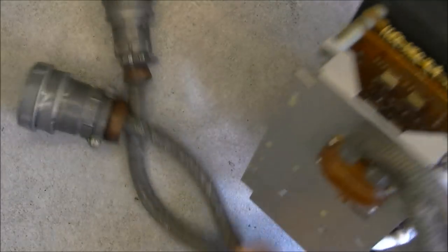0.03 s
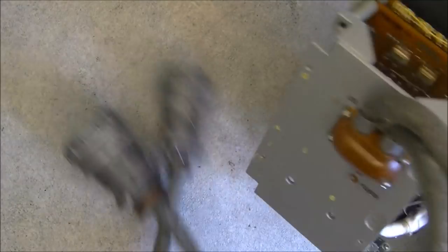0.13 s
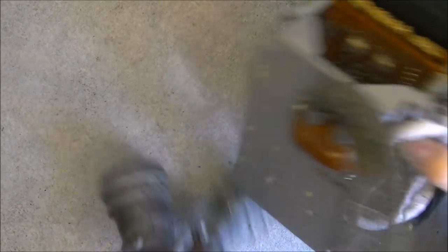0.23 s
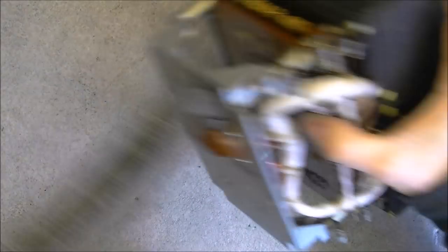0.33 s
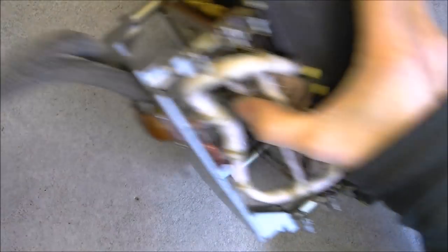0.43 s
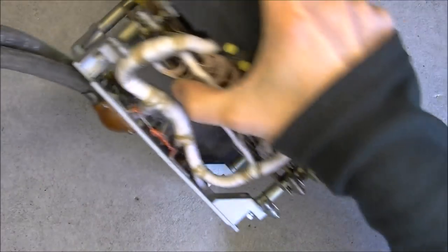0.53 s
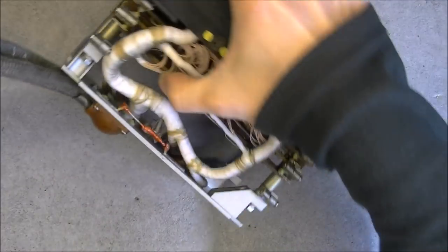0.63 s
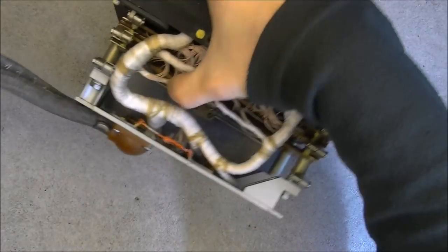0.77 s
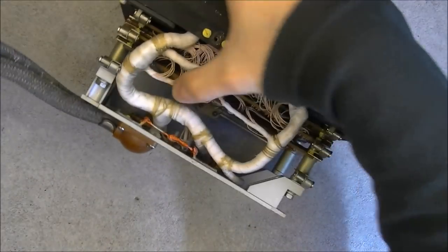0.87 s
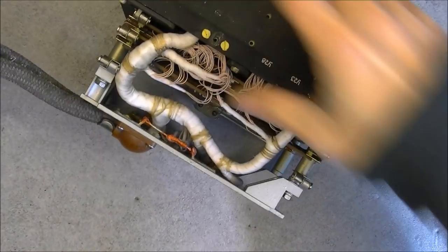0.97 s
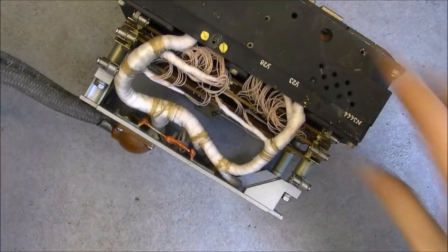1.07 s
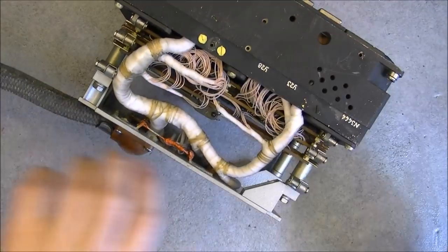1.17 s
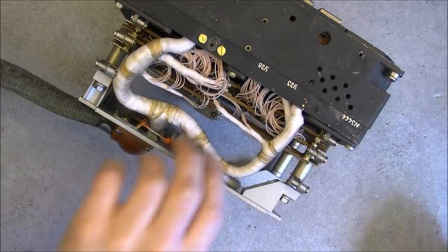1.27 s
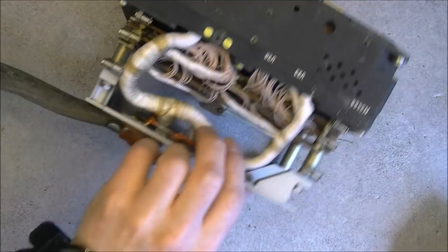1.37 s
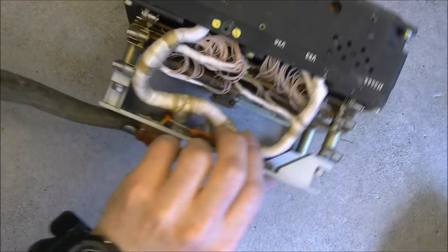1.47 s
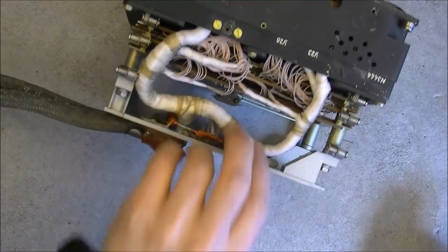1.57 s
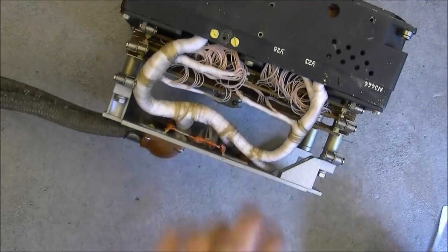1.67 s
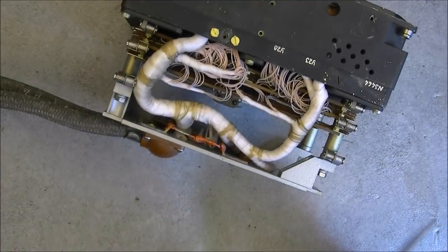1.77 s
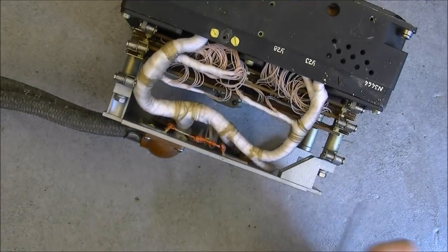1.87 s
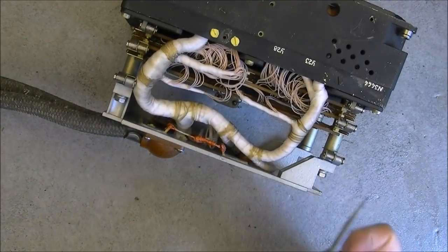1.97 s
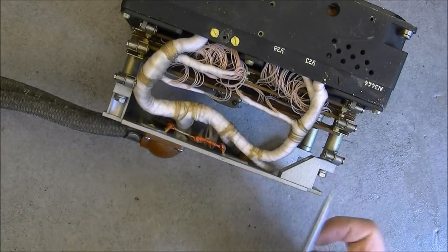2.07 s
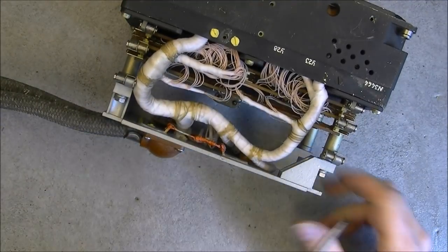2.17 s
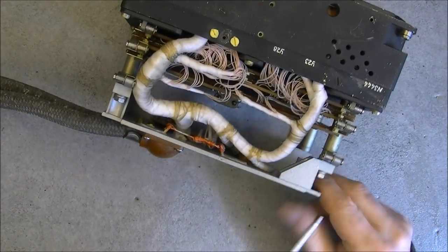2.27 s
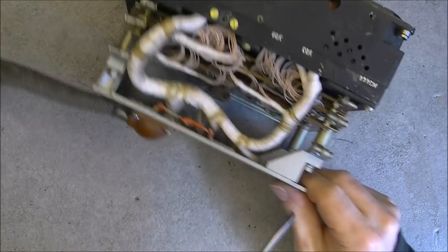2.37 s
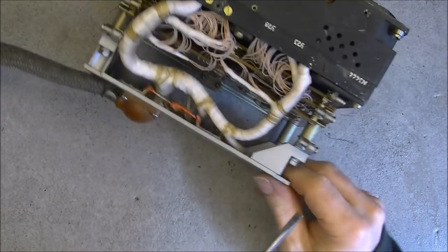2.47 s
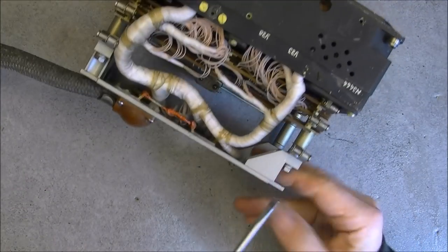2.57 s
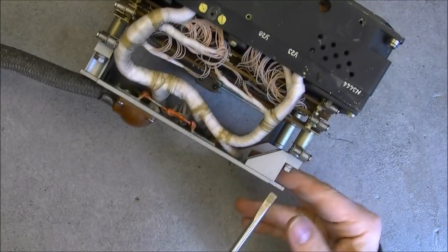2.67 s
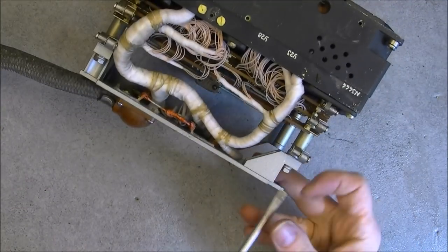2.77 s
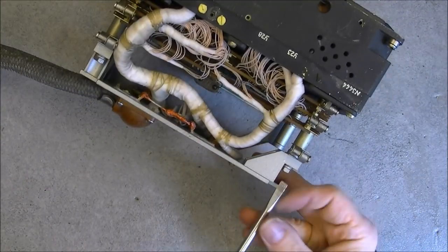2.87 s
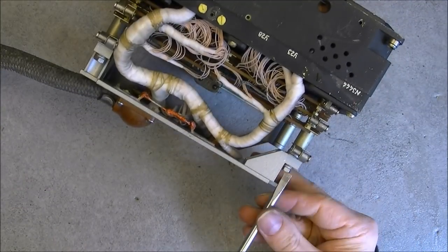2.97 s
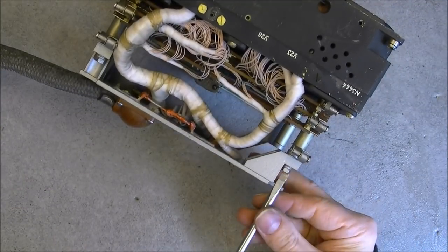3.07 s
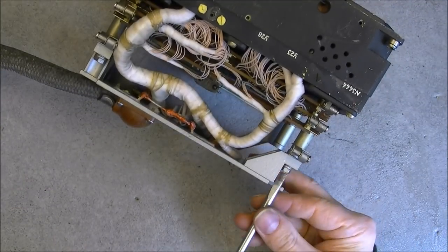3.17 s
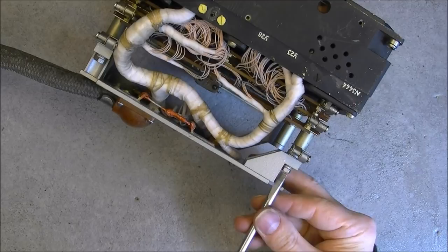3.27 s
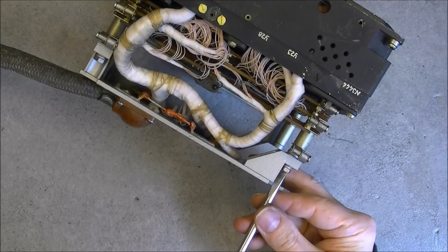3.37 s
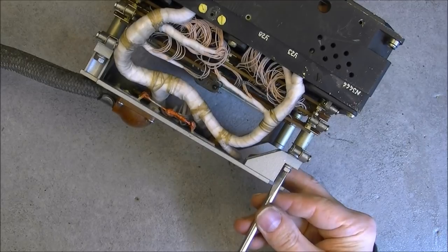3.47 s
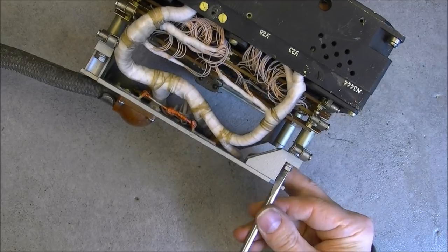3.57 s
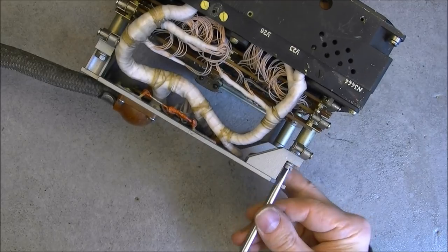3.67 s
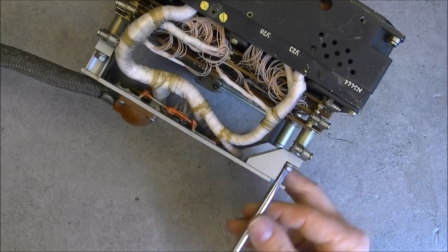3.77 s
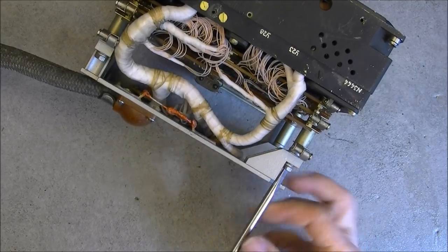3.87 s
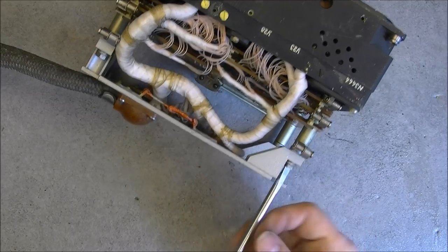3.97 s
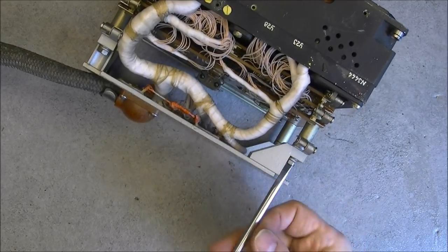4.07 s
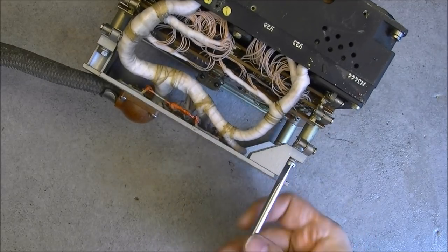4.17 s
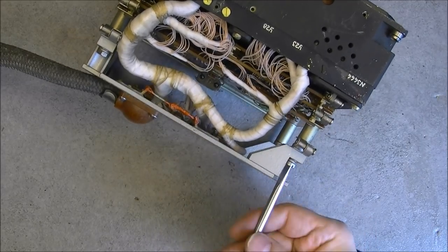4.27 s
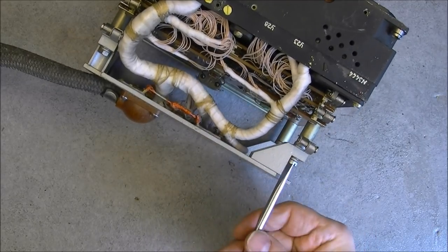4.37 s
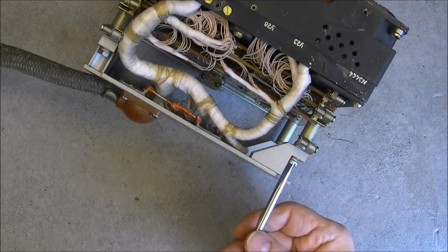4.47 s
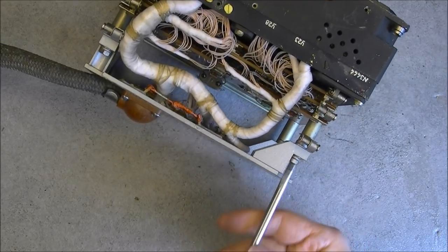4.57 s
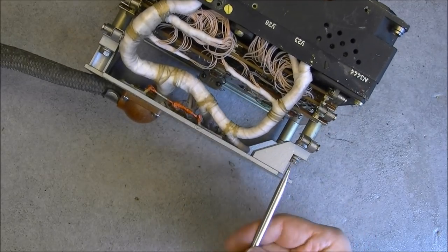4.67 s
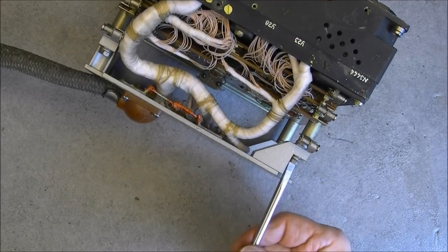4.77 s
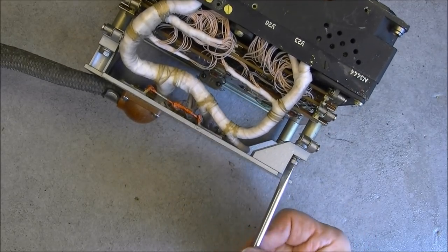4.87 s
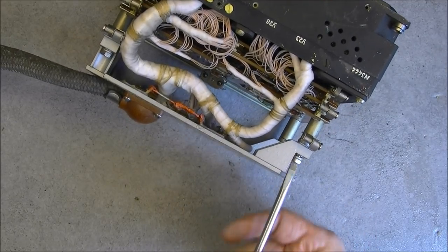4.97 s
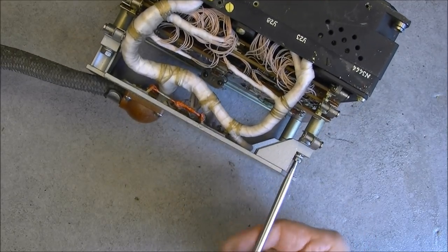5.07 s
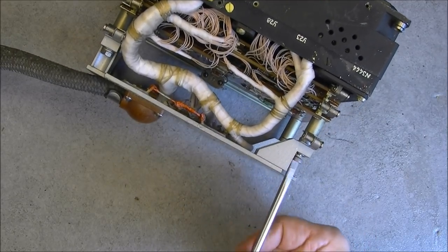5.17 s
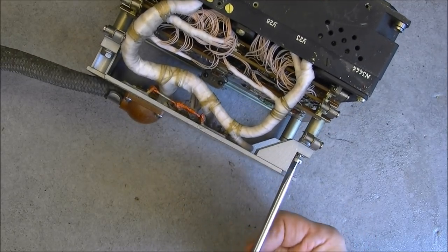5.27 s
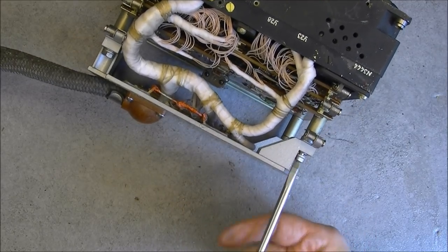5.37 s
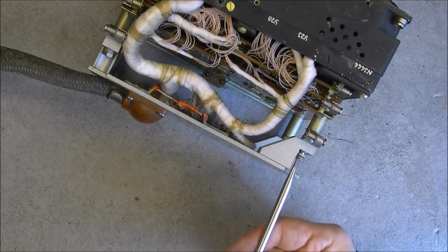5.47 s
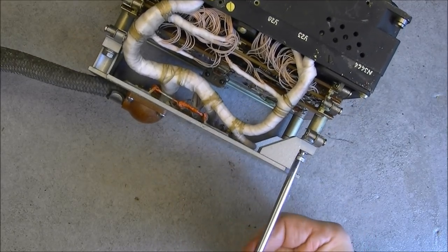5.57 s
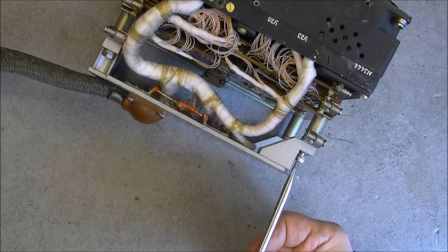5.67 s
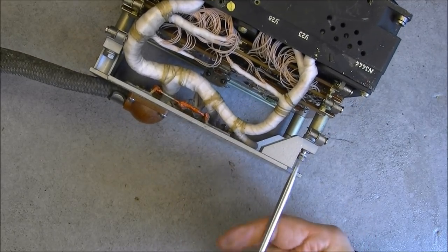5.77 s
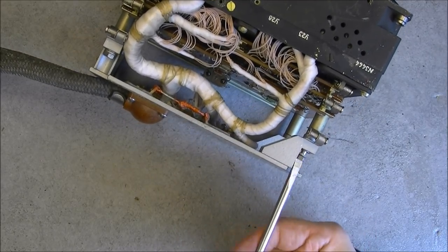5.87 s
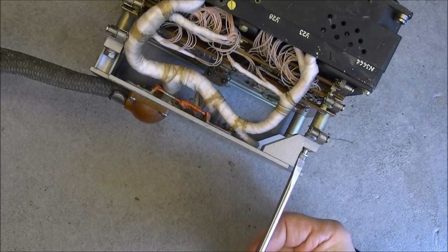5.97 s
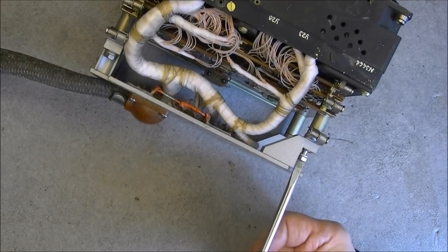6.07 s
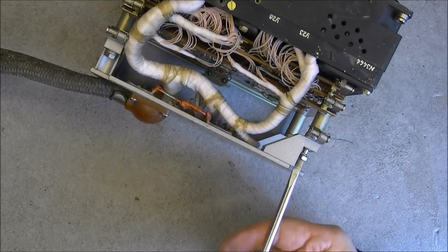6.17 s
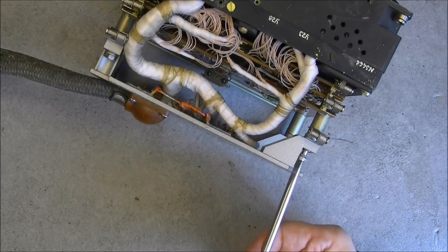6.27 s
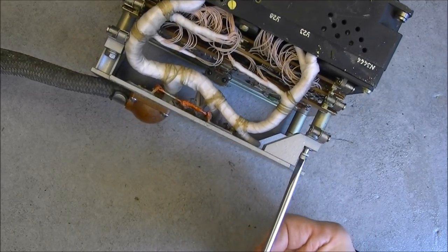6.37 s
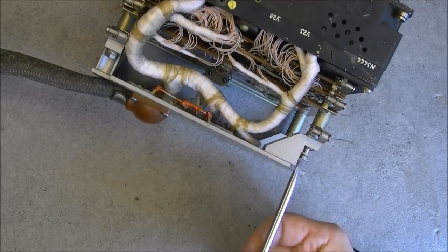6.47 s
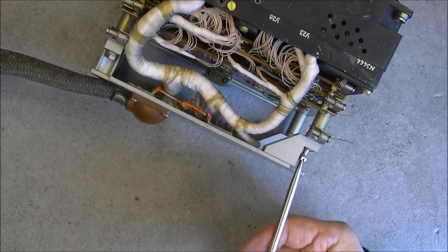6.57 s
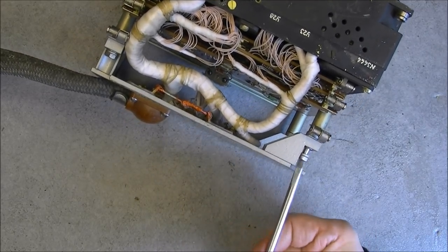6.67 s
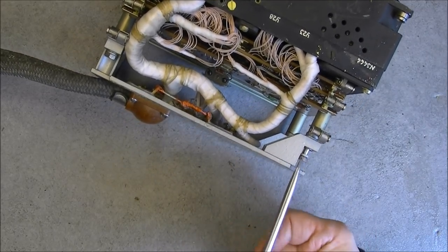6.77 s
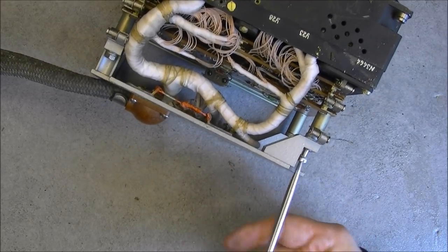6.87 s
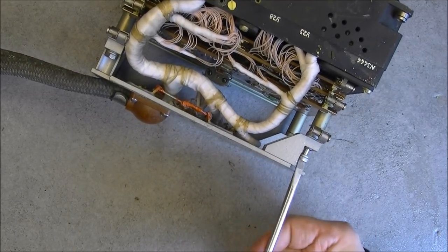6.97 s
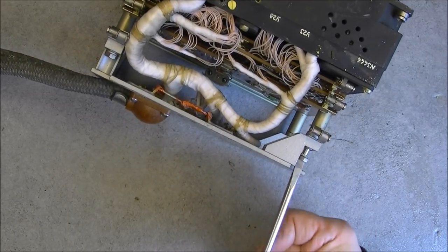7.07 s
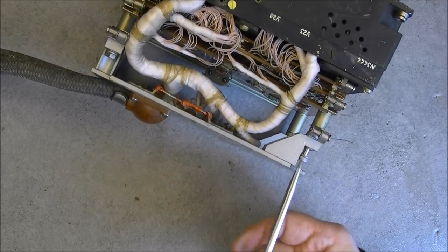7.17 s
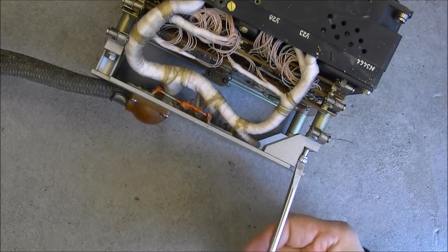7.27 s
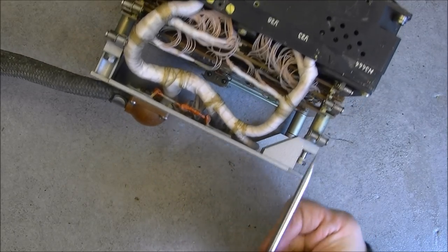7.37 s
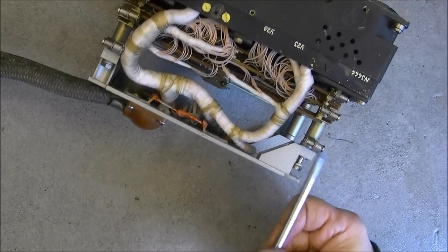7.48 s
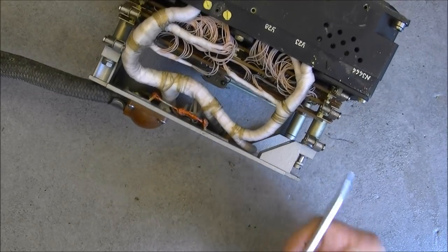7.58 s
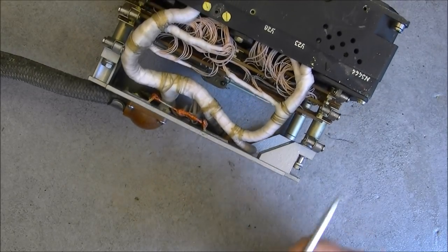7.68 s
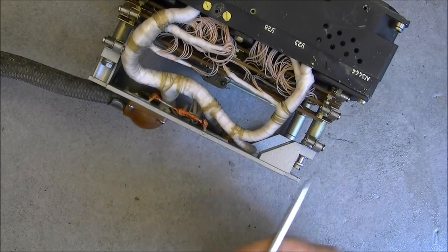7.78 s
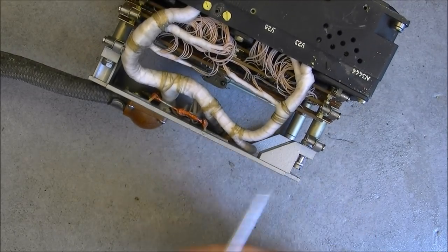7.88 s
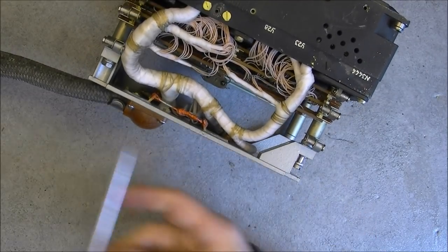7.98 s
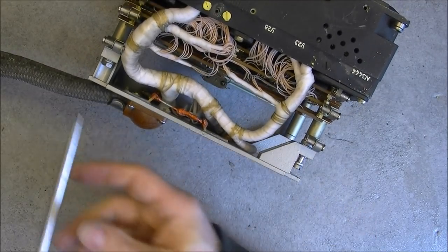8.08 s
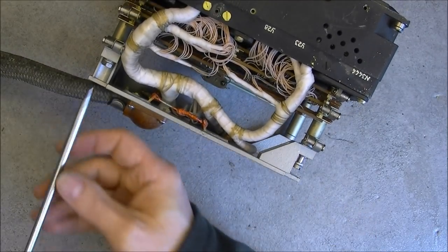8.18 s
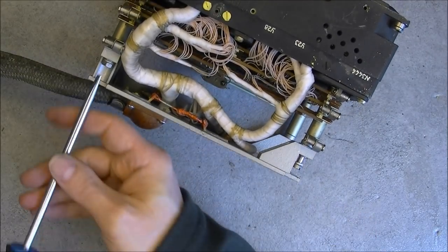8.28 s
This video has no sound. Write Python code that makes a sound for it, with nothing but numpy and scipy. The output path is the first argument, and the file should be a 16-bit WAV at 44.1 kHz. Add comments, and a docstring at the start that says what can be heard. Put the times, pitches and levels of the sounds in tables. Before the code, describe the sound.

Close up in a small room, a metal equipment chassis is swung round with loud scrapes and bright clinks, lands with a thump and is nudged into place. After quiet handling ticks, a screwdriver taps and skids onto a screw, turns it in quick regular rubbing strokes with a low rocking, then slips off with a sharp double clack and dull bump. A sleeve rustles past at the end.

```python
"""Metal chassis on a workbench

A metal equipment chassis is swung round and set down close by in a small room: it scrapes, its fittings clink,
it lands with a thump and is nudged into place. A screwdriver skids to a screw on the front panel, turns it in
short strokes and slips off with a double clack; a sleeve sweeps past. Blows ring damped modes and a noisy
clatter, rubbing is slip noise through resonances, and both excite a dense room tail over faint room air."""
import sys
import numpy as np
from scipy import signal
from scipy.fft import rfft, irfft
from scipy.io import wavfile
from scipy.ndimage import uniform_filter1d

SR = 44100
rng = np.random.default_rng(int(sys.argv[2]) if len(sys.argv) > 2 else 0)


def wav_out(sig):
    """Save sig, one row per channel (or a flat mono array), as 16-bit PCM at SR to the path in sys.argv[1]."""
    wavfile.write(sys.argv[1], SR, np.round(np.clip(np.atleast_2d(sig).T, -1, 1) * 32767).astype(np.int16))


N = 366912
TIME, HZ = np.arange(N) / SR, np.fft.rfftfreq(N, 1 / SR)

# Likeness of the two ears. Each row: frequency in Hz, left-right correlation from 0 to 1.
EAR_LIKENESS = [(60, .92), (140, .98), (280, .93), (500, .78), (1000, .5), (2000, .42), (4000, .25),
                (8000, .42), (13000, .2)]


def gain_of(db):
    """Decibel law: 20 dB is a tenfold amplitude."""
    return 10 ** (np.asarray(db) / 20)


def evened(x):
    """Normalisation of mean power: scales to rms 1."""
    return x / np.sqrt(np.mean(x ** 2) + 1e-20)


def read(points, hz):
    """Interpolation of a spectrum along a logarithmic frequency axis."""
    f, value = np.transpose(points)
    return np.interp(np.log(hz + 1), np.log(f + 1), value)


def level(rows, axis=1):
    """Amplitude envelope: interpolates one dB column over time, at -120 dB outside its span."""
    rows = np.array(rows)
    return gain_of(np.interp(TIME, rows[:, 0], rows[:, axis], left=-120, right=-120))


def add(mix, s, sound):
    """Superposition: mixes a sound into a stereo signal at time s."""
    part = mix[:, max(round(s * SR), 0):][:, :sound.shape[1]]
    part += sound[:, :part.shape[1]]


def noise(size=N, colour=((0, 0),)):
    """Partial interaural coherence: coloured stereo noise whose ears agree as far as EAR_LIKENESS says."""
    hz = np.fft.rfftfreq(size, 1 / SR)
    a, b = rfft(rng.standard_normal((2, size))) * gain_of(read(colour, hz))
    same = np.clip(read(EAR_LIKENESS, hz), -1, 1)
    return irfft([a, same * a + np.sqrt(1 - same ** 2) * b], size)


def coloured(x, gain):
    """Linear filtering: a gain for each frequency, then rms 1."""
    return evened(irfft(rfft(x) * gain, N))


def body(resonances):
    """Resonance response: sums the power of damped oscillators at each frequency."""
    power = 0
    for hz, width, db in resonances:
        detuning = (HZ ** 2 - hz ** 2) / (width * HZ + 1)
        power = power + gain_of(db) ** 2 / (1 + detuning ** 2)
    return np.sqrt(power)


def bands(x):
    """Band splitting: successive low- and high-pass filters give bass, middle, treble and top."""
    # Each entry: crossover frequency in Hz.
    crossovers_hz = (500, 2300, 6500)
    parts = []
    for hz in crossovers_hz:
        # each filter is run twice for a steeper slope
        low = np.tile(signal.butter(2, hz, "low", fs=SR, output="sos"), (2, 1))
        high = np.tile(signal.butter(2, hz, "high", fs=SR, output="sos"), (2, 1))
        parts.append(signal.sosfilt(low, x))
        x = signal.sosfilt(high, x)
    return parts + [x]


def band_gains(db, bright_db, lift_db, treble_share):
    """Contact stiffness: a hard contact tilts upward; a flexing panel lifts the middle and some treble."""
    step = np.arange(4) - 3 / 2
    return gain_of(db + bright_db * step + lift_db * np.array([0, 1, treble_share, 0]))


def dying(x, t60s):
    """Frequency-dependent damping: each frequency falls 60 dB in its own t60."""
    hz, t, z = signal.stft(x, SR, nperseg=256)
    decay = 10 ** (-3 * t / read(t60s, hz)[:, None])
    return signal.istft(z * decay, SR, nperseg=256)[1][:, :x.shape[1]]


def friction(slips_per_s, spread_db, smooth):
    """Stick-slip friction: many tiny slips of uneven size over a smooth hiss."""
    slipping = rng.random(N) < slips_per_s / SR
    sizes = gain_of(spread_db * np.minimum(rng.exponential(1, N), 4)) * slipping
    # the power of each slip decays with a time constant of 1.6 ms
    power = signal.lfilter([1], [1, -np.exp(-1 / (0.0016 * SR))], sizes ** 2)
    return noise() * np.sqrt(power / power.mean() + abs(smooth))


def swell(s, rise_s, fall_s, shape=2.3):
    """Kinematics of a hand movement: it gathers speed up to time s, then eases off."""
    return np.exp(-abs((TIME - s) / np.where(TIME < s, rise_s, fall_s)) ** shape)


def chatter(size, depth_db=6.0):
    """Repeated contact: metal on metal never meets just once but flutters within milliseconds."""
    flutter = evened(uniform_filter1d(rng.standard_normal(size), size=60))
    return gain_of(depth_db * np.clip(flutter, -2, 2))


def radiated(x, corner_hz=112):
    """Radiation efficiency: a small open chassis pushes hardly any deep bass into the air."""
    return signal.sosfilt(signal.butter(4, corner_hz, "high", fs=SR, output="sos"), x)


def blows(rows, modes, colour, clatter_db, clatter_s, buzz_db, buzz_s, size=16000):
    """Modal excitation: each blow rings the object's modes and a crowd of short dense ones."""
    out, t = np.zeros((2, N)), np.arange(size) / SR
    hz, mode_db, t60 = np.transpose(modes)[:, :, None]
    apart = np.arccos(np.clip(read(EAR_LIKENESS, hz), -1, 1))  # higher modes reach the ears out of step
    for s, contact, ring, db, bright_db, lift_db in rows:
        phase, side, uneven, grip = rng.standard_normal((4, len(hz), 1))
        tones = gain_of(mode_db + 1.5 * uneven) * 10 ** (-3 * t / (t60 * ring))
        # the grip detunes each blow a little
        turn = 2 * np.pi * hz * (1 + 0.0027 * grip) * t + phase * apart * 2
        half_gap = np.sign(side) * apart / 2
        rung = np.array([(tones * np.sin(turn + ear * half_gap)).sum(0) for ear in (-1, 1)])
        # a crack from the contact, then the buzz of loose parts
        crack = np.exp(-t / (clatter_s * ring + contact))
        buzz = gain_of(buzz_db) * np.exp(-t / (buzz_s * ring))
        clatter = chatter(size) * noise(size, colour) * (crack + buzz)
        onset = 1 - np.exp(-(t / contact) ** 2)
        sound = (evened(rung) + gain_of(clatter_db) * evened(clatter)) * onset
        # where the blow lands sets its colour; each band is levelled over its first 20 ms
        first = round(.02 * SR)
        gains = band_gains(db, bright_db, lift_db, treble_share=0.31)
        parts = bands(radiated(sound))
        add(out, s, sum(gain * part / part[:, :first].std() for gain, part in zip(gains, parts)))
    return out


def background(ramp_s=.04):
    """Stationary noise and free decay: room air, thin whines and a low ring that dies slowly."""
    # Spectrum of the room air. Each row: frequency in Hz, relative level in dB.
    air_colour = [(15, -43), (25, -3), (180, -2.5), (217, -6.5), (335, -7), (575, -9), (936, -7),
                  (1070, -9.5), (2480, -13), (2760, -11.5), (5280, -19.5), (12200, -23.5), (16000, -24)]
    # Faint electrical whines. Each row: frequency in Hz, rms level in dB.
    whine_tones = [(2726, -74.5), (14350, -81)]
    air_db = -56
    whines = sum(gain_of(db) * evened(np.sin(2 * np.pi * hz * TIME)) for hz, db in whine_tones)
    # the low ring dies slowly until the hand stops it
    from_s, to_s, linger_hz = 0.57, 3.1, 166.9
    start_db, fall_db_per_s = -46.5, 10.5
    free = np.clip(np.minimum(TIME - from_s, to_s - TIME) / ramp_s, 0, 1)
    decay = gain_of(start_db - fall_db_per_s * (TIME - from_s))
    linger = free * decay * evened(np.sin(2 * np.pi * linger_hz * TIME))
    return gain_of(air_db) * coloured(noise(), gain_of(read(air_colour, HZ))) + whines + linger


def sliding():
    """Friction-driven resonance: slip noise rings the chassis, with a few light brushes and swishes."""
    # Resonances of the sliding chassis. Each row: frequency in Hz, width in Hz, relative level in dB.
    slide_body = [(72, 8.9, -17), (171, 48, 5.5), (216, 36, 6), (275.7, 9.6, 11.5), (398.8, 9.8, 11.5),
                  (465.5, 20, 5), (562, 84, -2), (704, 360, -4), (898, 42, -0.5), (1060, 74, -4.5),
                  (1275, 130, -10.5), (1630, 390, -5), (1810, 86, -19), (2145, 120, -14), (2970, 35, -10.5),
                  (3410, 340, -16), (4430, 91, -18), (4770, 62, -12.5), (5600, 910, -21), (7900, 1040, -24),
                  (9900, 1600, -26), (12100, 990, -27.5)]
    # Shoves of the chassis, with a few light brushes and swishes of the screwdriver. Each row: time of the
    # peak in seconds, swell in seconds, fade in seconds, relative level in dB, brightness in dB per band,
    # midrange lift in dB.
    strokes = [(0.0, .02, 0.079, -25, -3.5, -2), (0.1, 0.026, 0.054, -24, -8, -10),
               (0.175, 0.08, 0.048, -18.5, -4.5, 0), (0.304, 0.045, 0.028, -30.5, 1, 9),
               (0.48, 0.037, .08, -45.5, -4, -0.5), (0.69, 0.054, 0.069, -25.5, 2.5, -3.5),
               (0.815, 0.027, .1, -42.5, -10.5, 4.5), (1.03, 0.13, 0.11, -46.5, 2.5, 4),
               (1.165, 0.037, 0.12, -39, 0.8, 7), (1.28, 0.033, 0.065, -36, 3, 2),
               (1.415, 0.029, 0.017, -44.5, -5.5, 9), (1.504, 0.062, 0.053, -31.5, -4, 0.5),
               (1.755, 0.023, 0.027, -55, -15.5, 11.5), (1.85, 0.032, 0.044, -67.5, -6, 23),
               (2.345, 0.03, 0.048, -38, -5, 1.5), (2.465, 0.058, 0.048, -28.5, -3.5, 2.5),
               (2.66, 0.056, 0.061, -48.5, 0, -2), (2.785, 0.043, 0.034, -47, 0.5, -1),
               (3.56, 0.11, .12, -59.5, -6, 1), (3.89, 0.065, 0.097, -48.5, 5, 2),
               (4.09, 0.057, .05, -52, -5.5, 0), (4.45, 0.032, 0.043, -49.5, -7, 7.5),
               (7.66, 0.17, 0.21, -55, 1.5, 5.5), (7.715, 0.021, 0.042, -48.5, 7.5, -2)]
    grating = coloured(friction(slips_per_s=900, spread_db=3.0, smooth=1.0), body(slide_body))
    power = 0
    for s, rise, fall, *contact in strokes:
        gains = band_gains(*contact, treble_share=0.86)
        power = power + np.outer(gains, swell(s, rise, fall)) ** 2
    return sum(np.sqrt(p) * evened(part) for p, part in zip(power, bands(grating)))


def knocks():
    """Impact of a heavy body: the whole chassis against the bench excites the low modes."""
    # Knocks on the bench. Each row: start in seconds, contact time in seconds, ring length as a factor,
    # relative level in dB, brightness in dB per band, midrange lift in dB.
    strikes = [(0.052, 0.0027, 0.49, -28, -3.5, -9), (0.612, 0.0014, .3, -43.5, -15.5, 1),
               (0.7655, 0.00039, 0.37, -25.5, -12, 3.5), (1.309, 0.0022, 0.45, -43.5, -10, -4),
               (1.697, 0.0017, 0.66, -41, -5, -4), (3.994, 0.0004, 0.87, -48, -7, 6.5),
               (4.227, .0015, 0.61, -42.5, -8.5, 9), (4.607, 0.0016, 1, -50, -7, 8),
               (7.492, 0.0015, 0.5, -41.5, -12, -12), (7.618, 0.0048, 0.46, -48, -7, -13),
               (7.87, 0.0022, 0.39, -50, -10, -11)]
    # Modes of the bench. Each row: frequency in Hz, relative level in dB, t60 in seconds at ring factor 1.
    modes = [(153.3, -6, 0.57), (186, 4, 0.16), (222.5, -4.5, 0.15), (259, 0, 0.23), (301, 6, 0.067),
             (402, -6.5, 0.17), (377, -31, 0.059), (539, -11, 0.15), (743, -18, 0.21), (904, -20, 0.32),
             (1320, -21, 0.44)]
    # Its dense, short-lived modes. Each row: frequency in Hz, relative level in dB.
    dense = [(25, -29), (60, -21), (95, -15), (150, 6), (300, -7), (500, -8.5), (850, -9), (2300, -19.5),
             (6500, -26), (15000, -28)]
    return blows(strikes, modes, dense, clatter_db=-5.0, clatter_s=0.017, buzz_db=-15, buzz_s=0.034)


def clinks():
    """Impact of small stiff bodies: steel fittings, edges and a screwdriver tick at high frequencies."""
    # Clinks of the fittings and light ticks of the screwdriver being picked up. Each row: start in seconds,
    # contact time in seconds, ring length as a factor, relative level in dB, brightness in dB per band,
    # midrange lift in dB.
    strikes = [(0.0755, 0.00018, 0.15, -35.5, 1, 9), (0.172, 0.00034, 0.45, -22.5, 3.5, -7),
               (0.186, 0.00026, 0.12, -33, 5, 10), (0.2335, 0.0004, 0.093, -30.5, 10, 5),
               (0.3205, 0.00033, 0.31, -24, 6.5, 0.5), (0.6105, 0.0029, 0.21, -34.5, 12.5, 16),
               (0.642, 0.0019, 0.1, -33, 11.5, 9), (0.683, 0.0021, 0.42, -30, 5.8, 4),
               (0.9843, .0005, .35, -57, 4, 13), (1.0606, 0.00044, .45, -54, 4.5, 13),
               (1.1145, 0.00056, 0.3, -56.5, 5, 12), (1.2098, 0.0015, 0.26, -29, 4, 14.5),
               (1.2675, 0.00022, 0.33, -32.5, 4, 5), (1.3953, .0009, .35, -49.5, -4.5, -4),
               (2.1188, 0.00044, 0.24, -65.5, 3, 16.5), (2.18, 0.005, 1, -70.5, 3, 27.5),
               (2.4075, .0001, 0.045, -40, 2.5, -8), (2.6556, 0.00041, 0.88, -48, -3.5, 1),
               (3.3096, .0005, .35, -61.5, 5.3, -2), (3.681, .0003, 0.44, -60.5, 5.5, 8.5),
               (4.0215, .0004, 0.28, -41.5, -3.5, -28), (4.1305, 0.00064, 0.068, -47.5, 14.5, 14.5)]
    # Modes of the fittings. Each row: frequency in Hz, relative level in dB, t60 in seconds at ring factor 1.
    modes = [(3070, -11.5, 0.028), (4200, -21, 0.049), (5030, 10.5, 0.062), (4940, 3, 0.52),
             (5760, 1, 0.17), (7880, 12.5, 0.15), (7450, -44.5, 0.4), (8460, 21.5, 0.031),
             (7750, -36, 0.04), (8960, 9, .05), (13100, -4, 0.16)]
    # Their dense, short-lived modes. Each row: frequency in Hz, relative level in dB.
    dense = [(100, -8.5), (1000, -14.5), (2300, -0.5), (4200, 3.5), (5300, 12), (6900, 3), (8100, 4.5),
             (10800, 3), (12900, 6.5), (14500, -9)]
    return blows(strikes, modes, dense, clatter_db=4, clatter_s=.004, buzz_db=-13.5, buzz_s=0.053)


def bumps(contact_s=0.003, size=20000):
    """Low-frequency modal sway: a soft push moves the bench top, the same in both ears."""
    # Pushes on the bench top. Each row: start in seconds, relative level in dB.
    pushes = [(0.768, -36.5), (1.31, -46), (1.693, -31.5), (2.63, -53), (7.491, -28.5), (7.615, -48)]
    # Sway of the bench top. Each row: frequency in Hz, relative level in dB, t60 in seconds.
    sway_modes = [(34, -18, .3), (52, -2, 0.15), (71, 0, 0.26), (108, -7, 0.075)]
    out, t = np.zeros((2, N)), np.arange(size) / SR
    sway = 0
    for hz, db, t60 in sway_modes:
        sway = sway + gain_of(db) * 10 ** (-3 * t / t60) * np.sin(2 * np.pi * hz * t)
    onset = 1 - np.exp(-t / contact_s)
    for s, db in pushes:
        add(out, s, gain_of(db) * (sway * onset)[None])
    return out


def taps():
    """Impact on a thin plate: fingers and screwdriver excite the modes of the panel."""
    # Taps on the panel. Each row: start in seconds, contact time in seconds, ring length as a factor,
    # relative level in dB, brightness in dB per band, midrange lift in dB.
    strikes = [(1.6445, 0.0019, 0.66, -62.5, 0.5, 17.7), (1.7457, 0.0017, 0.46, -65, -6, 5.4),
               (1.955, .0023, .6, -75.5, 1.5, 23.6), (3.016, 0.00041, 0.56, -39, 0, 17.1),
               (3.066, .002, .5, -59.5, -11, 18.5), (3.1116, 0.00062, .55, -61.5, -6.5, 12.4),
               (3.3795, 0.00036, 0.96, -56.5, -5, 24.9), (3.438, 0.0011, 0.55, -43, -3, 3.5),
               (3.595, 0.0013, .35, -61.5, -7.5, 14.7), (3.826, 0.00095, 0.65, -63, -7, 6.5),
               (3.9235, 0.00045, 1, -53, -3.5, 4.2), (4.153, .0009, 0.61, -60, 4.7, 17.5),
               (4.167, 0.00088, .35, -65.5, 1, 15), (5.4233, .001, 0.69, -52.5, -1, 7.4),
               (7.371, 0.00065, 0.48, -33.5, 2, 14), (7.377, 0.0035, 0.39, -25, 2, 5.5),
               (7.394, 0.0039, 1, -50.5, -7, 23.7), (7.4362, .0006, 0.37, -28.5, -1.5, 13.7),
               (7.462, .0005, 0.89, -45.5, 2, 24.6), (7.523, 0.0013, .7, -47.5, -7.5, 4.4)]
    # Modes of the panel. Each row: frequency in Hz, relative level in dB, t60 in seconds at ring factor 1.
    modes = [(228.6, -4, 0.27), (585, -13, 0.39), (707.4, -7.5, 0.34), (834, -13, 0.41), (922, -5, 0.14),
             (1110, -13, 0.14), (1235, 3, 0.098), (1296, 5.5, 0.11), (1360, -10, 0.42), (1667, 14, 0.04),
             (1734, 9.5, 0.11), (1783, -12, 0.39), (1855, 0, 0.04), (2014, 4.5, 0.081), (2600, -25, 0.16),
             (3323, 0.5, 0.083), (3810, 4.5, 0.043), (4030, -26, 0.045), (4360, 1.5, 0.086),
             (7160, -16, 0.086)]
    # Its dense, short-lived modes. Each row: frequency in Hz, relative level in dB.
    dense = [(60, -26), (130, -17), (230, -6), (450, 3.5), (1300, 5), (2400, 2), (3500, 6.5), (8000, -10.5),
             (12000, -19), (15000, -42)]
    return blows(strikes, modes, dense, clatter_db=-1.0, clatter_s=0.00067, buzz_db=-12, buzz_s=0.015)


def skidding():
    """Friction-driven resonance: the blade slides on the screw head and makes the panel sing."""
    # The blade seeks the slot, starts to turn and slips off. Each row: time of the peak in seconds,
    # swell in seconds, fade in seconds, level in dB.
    skids = [(3.755, 0.028, 0.04, -49), (3.9, 0.068, 0.049, -63), (4.12, 0.1, 0.063, -47),
             (4.37, 0.064, 0.067, -58), (4.85, 0.42, 0.39, -44.5), (7.372, 0.018, .008, -29.5)]
    # Resonances of the panel under the skids. Each row: frequency in Hz, width in Hz, relative level in dB.
    skid_body = [(1356, 130, -0.5), (1390, 76, 3), (1653, 99, 5.5), (2260, 440, -8.5), (4670, 1600, -18),
                 (7300, 930, -15), (8850, 4800, -24.5)]
    speed = sum(gain_of(db) * swell(s, rise, fall, shape=2.35) for s, rise, fall, db in skids)
    rub = friction(slips_per_s=200, spread_db=2.5, smooth=1.0)
    return speed * coloured(rub, body(skid_body) * HZ / (HZ + 900))


def screwing():
    """Thread friction: each turn hisses and sings in the panel; the chassis rocks under the hand."""
    # Turns of the screw. Each row: time of the peak in seconds, half length in seconds, relative level of
    # the rub in dB, relative level of the rocking in dB, lag of the rocking in seconds.
    turns = [(4.626, 0.05, -41.5, -37, -0.022), (4.958, 0.25, -40.5, -37, 0.046),
             (5.25, 0.036, -38.5, -35.5, 0.013), (5.438, 0.09, -40, -38, 0.045),
             (5.631, 0.058, -39.5, -35.5, 0.028), (5.814, 0.069, -38, -42.5, -0.039),
             (6.004, 0.067, -38.5, -32, 0.025), (6.19, 0.056, -38, -45, 0.018),
             (6.373, 0.07, -39, -31.5, 0.015), (6.554, 0.068, -39.5, -40, -0.036),
             (6.717, 0.046, -36, -33.5, 0.0014), (6.893, 0.064, -38, -34, -0.02),
             (7.065, 0.045, -32.5, -31, 0.024), (7.238, 0.078, -39.5, -36.5, -0.011)]
    # Panel resonances under the screwdriver. Each row: frequency in Hz, width in Hz, relative level in dB.
    turn_body = [(727, 116, 1), (847, 66, -0.5), (1276, 61, 5), (1420, 49, -6), (1668, 107, 5.5),
                 (2400, 300, -35), (3367, 53, -3), (4540, 980, -11)]
    # Hiss of the thread. Each row: frequency in Hz, relative level in dB.
    thread_hiss = [(100, -42), (350, -8), (1000, -18.5), (2600, -14), (5000, -17), (9500, -13.5),
                   (12000, -16.5), (16000, -30)]
    # Resonances of the rocking chassis. Each row: frequency in Hz, width in Hz, relative level in dB.
    rock_body = [(76.5, 10.6, -7.5), (136, 30, -12), (199.2, 15.4, 2), (267, 45, -8), (404, 23, -15.5)]
    stroke, tipping = 0, 0
    for s, half, rub_db, rock_db, lag in turns:
        stroke = stroke + gain_of(rub_db) * np.exp(-((TIME - s) / half) ** 2)
        # the chassis tips quickly and settles slowly
        tipping = tipping + gain_of(rock_db) * swell(s + lag, rise_s=0.034, fall_s=0.066, shape=1.3)
    # smooth: even hiss of the thread, as a multiple of the power of its slips
    rub = friction(slips_per_s=3800, spread_db=6, smooth=1.1)
    thread = coloured(rub, body(turn_body) + gain_of(read(thread_hiss, HZ)))
    rocking = coloured(noise(), body(rock_body) / (1 + (HZ / 700) ** 2))
    return gain_of(-2.0) * stroke * thread + gain_of(-3.5) * tipping * rocking


def sleeve(width_hz=170):
    """Cavity resonance: cloth hisses past with a hollow rustle whose pitch follows the gap under the arm."""
    # Course of the sleeve. Each row: time in seconds, relative level of the rustle in dB,
    # resonance in Hz, relative level of the hiss in dB.
    sweep = [(7.78, -50, 298, -57), (7.82, -48.5, 440, -60.5), (7.852, -57, 239, -51),
             (7.868, -47, 239, -55.5), (7.99, -43.5, 563, -52), (8.234, -40.5, 231, -50.5),
             (8.32, -44.5, 274, -55.5)]
    # Spectrum of the hiss. Each row: frequency in Hz, relative level in dB.
    hiss_colour = [(300, -21), (900, 4), (1800, 3), (3000, 0.5), (9000, -5), (12000, -4.5), (16000, -8)]
    s, _, hz, _ = np.transpose(sweep)
    # shifted down to 0 Hz, smoothed, and shifted back: a resonance that moves
    turn = np.exp(2j * np.pi * np.cumsum(np.interp(TIME, s, hz)) / SR)
    r = np.exp(-np.pi * width_hz / SR)
    rustle = coloured(noise(), 1 / (1 + (HZ / 1100) ** 2))
    hollow = (turn * signal.lfilter([1 - r], [1, -r], rustle / turn)).real
    hiss = coloured(friction(slips_per_s=3000, spread_db=-9, smooth=1.4), gain_of(read(hiss_colour, HZ)))
    return gain_of(-0.5) * level(sweep) * evened(hollow) + gain_of(3.5) * level(sweep, axis=3) * hiss


def room(x, onset_s=0.0089, size=26000):
    """Reverberation: dense reflections swell in a few milliseconds and die at a speed set by frequency."""
    # Decay of the room. Each row: frequency in Hz, t60 in seconds.
    room_t60 = [(100, 0.28), (260, 0.46), (700, 0.42), (1840, 0.28), (4850, 0.29), (12800, 0.2)]
    onset = 1 - np.exp(-(np.arange(size) / SR / onset_s) ** 2)
    tail = dying(noise(size), room_t60) * onset
    return signal.fftconvolve(x, tail / np.linalg.norm(tail[0]), axes=1)[:, :N]


def scene():
    """Superposition of direct and reverberant sound: blows, rubbing and the room around them."""
    hits = gain_of(-4.0) * clinks() + gain_of(-0.45) * taps() + gain_of(-4.5) * knocks()
    rubs = gain_of(-11.5) * sliding() + screwing() + skidding() + sleeve()
    echoes = gain_of(-12.0) * room(hits) + gain_of(-10.0) * room(rubs)
    return hits + rubs + echoes + bumps() + background()


def record(dry, low_cut_hz=48, top_hz=14200):
    """Band limiting and soft saturation: microphones lose both extremes, and the loudest peaks are rounded."""
    heard = signal.sosfilt(signal.butter(2, low_cut_hz, "high", fs=SR, output="sos"), dry)
    heard = signal.sosfilt(signal.butter(4, top_hz, fs=SR, output="sos"), heard)
    rounded = heard / (1 + heard ** 6) ** (1 / 6)
    band_limit = signal.firwin(255, 15900, window=("kaiser", 9), fs=SR)  # edge in Hz
    return signal.oaconvolve(rounded, band_limit[None], "same")


dry = scene()
out = record(dry)
wav_out(out)
```